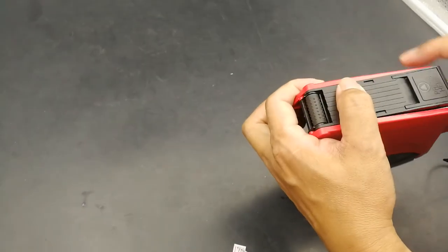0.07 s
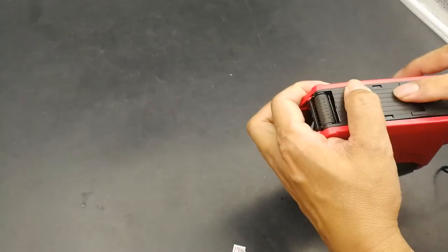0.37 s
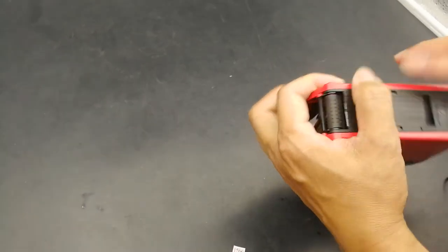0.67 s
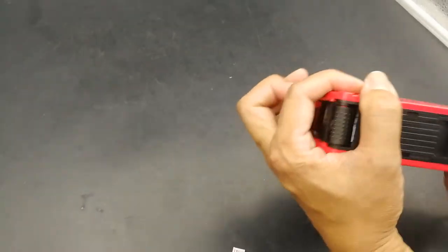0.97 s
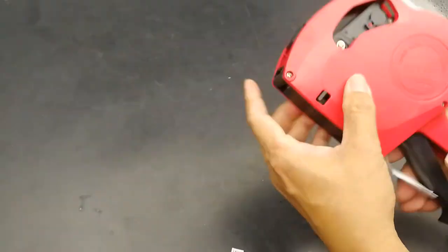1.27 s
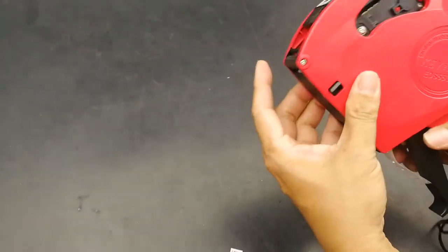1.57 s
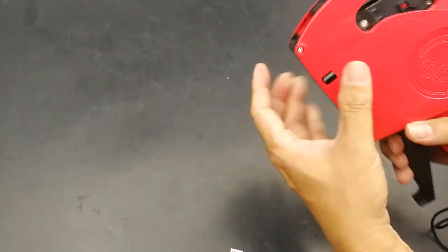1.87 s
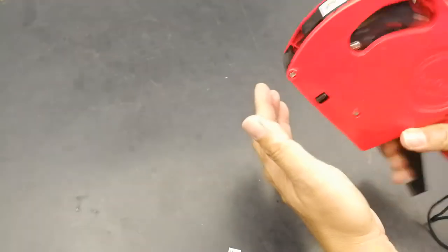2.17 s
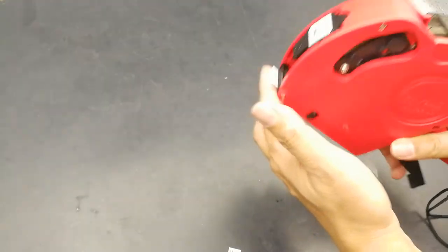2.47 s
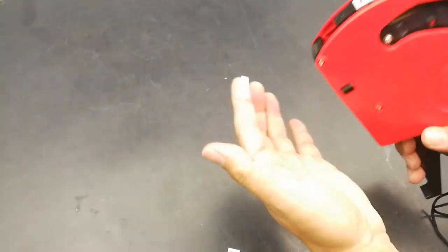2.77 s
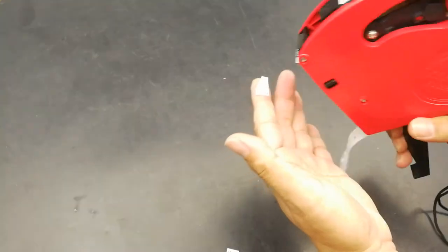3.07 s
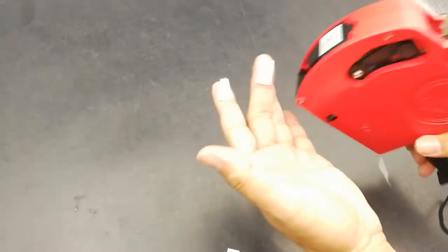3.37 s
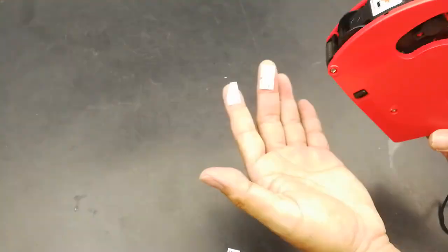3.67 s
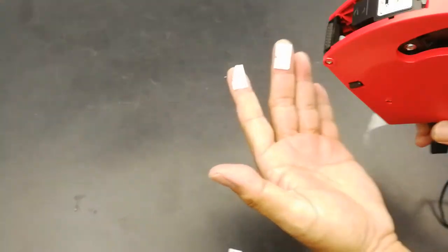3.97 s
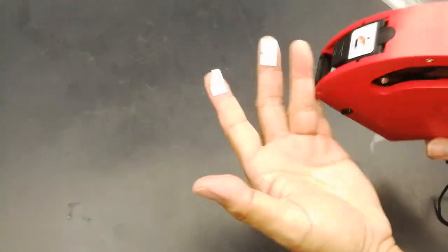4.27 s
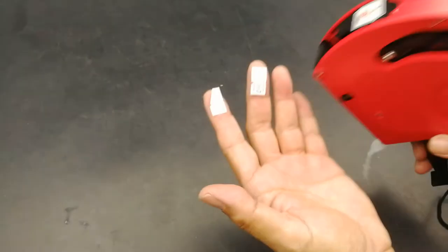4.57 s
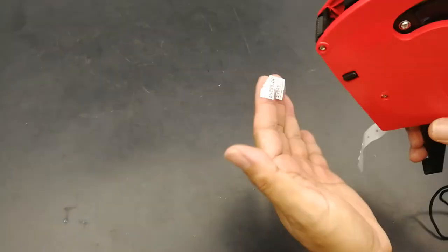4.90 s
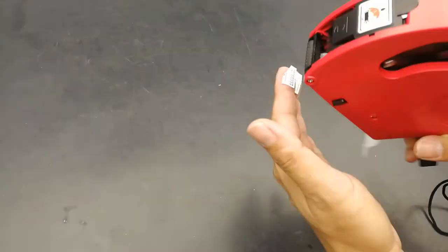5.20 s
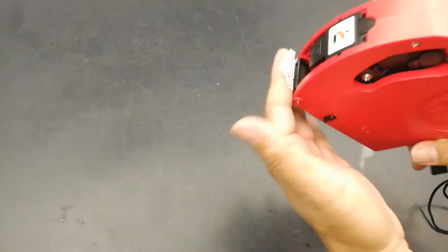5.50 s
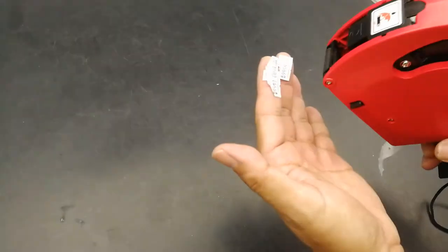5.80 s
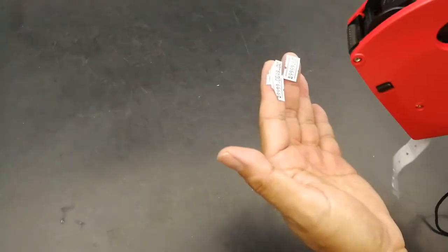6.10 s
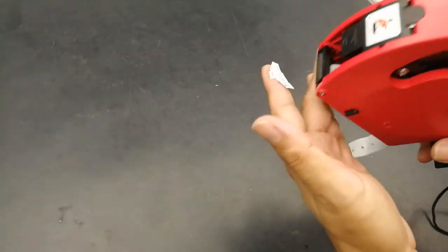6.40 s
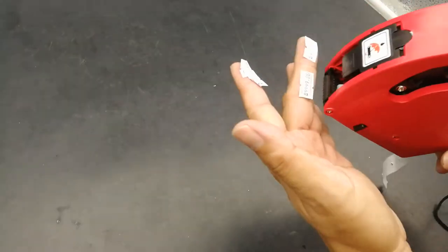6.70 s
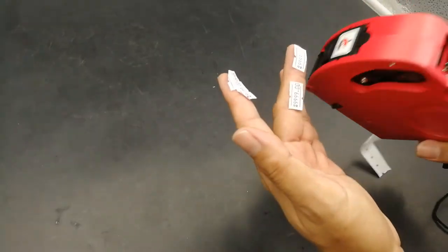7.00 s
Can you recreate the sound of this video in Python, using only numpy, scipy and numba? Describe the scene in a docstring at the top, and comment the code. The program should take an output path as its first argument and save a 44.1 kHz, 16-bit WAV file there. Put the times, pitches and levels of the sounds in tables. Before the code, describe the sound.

Close to the microphone in a small, quiet room, a handheld label gun gives one bright snap and some light handling noise. Five sharp double clacks follow at a fairly even pace as the lever is squeezed and released, with a short ring from the hollow plastic case and its spring. After each pair, the roller taps and rubs a label onto a finger. Ventilation hums softly underneath.

```python
"""Five sharp plastic double clacks with light clicks and rubs between them, over a soft ventilation hum.
A price labeller is snapped shut, turned over and squeezed five times in a small quiet room.
Each squeeze scrapes the lever along, slams the print head home and lets it spring back; the hollow case
and the return spring ring. After each one the roller wipes the label onto a finger."""
import sys
import numpy as np
from scipy import signal
from scipy.fft import rfft, irfft
from scipy.io import wavfile
from scipy.ndimage import uniform_filter1d, minimum_filter1d
from numba import njit

SR = 44100
rng = np.random.default_rng(int(sys.argv[2]) if len(sys.argv) > 2 else 0)


def digitize_waveform(pressure):
    """Quantize a signal to 16-bit integers and store it at the path in sys.argv[1].

    Rows of a 2-D input are taken as channels; values are limited to [-1, 1].
    """
    field = np.atleast_2d(pressure).T
    bounded = np.clip(field, -1, 1)
    quanta = np.round(bounded * 32767).astype(np.int16)
    wavfile.write(sys.argv[1], SR, quanta)


N = 310905
RING = 16384  # samples that one contact is given to ring out
AGE = np.arange(RING) / SR  # seconds since a contact
TIME = np.arange(N) / SR
SLAM, RETURN, OUTSIDE = 0, 1, 2  # kinds of contact: each picks its own column of ring levels

# tone colour (how strong each frequency is) of a blow inside the case: (frequency [Hz], level [dB])
SLAM_COLOUR = [(100, -18), (350, -30.5), (600, -20.5), (830, -19.5), (1100, -7), (1600, -5), (2200, -7),
               (3300, -3), (5500, -1), (8000, -1.5), (10100, 2.5), (11000, -5), (13500, -11), (16000, -31)]
# tone colour of a touch on the outer shell: (frequency [Hz], level [dB])
SHELL_COLOUR = [(100, -46), (500, -53), (750, -24), (1100, -3.5), (1600, -2.5), (2800, -1), (4100, 0),
                (5500, -3), (8000, -1), (10000, -2), (11200, -11.5), (13500, -18), (16000, -29)]


def undb(db):
    """Turn decibels into a factor to multiply by."""
    return 10 ** (np.asarray(db) / 20)


def fade(t60):
    """A decay that loses 60 dB in t60 seconds."""
    return np.exp(-np.log(1000) * AGE / t60)


def unit(x):
    """Scale a signal to an average (rms) level of 1."""
    return x / np.sqrt(np.mean(x ** 2))


def wander(samples):
    """A random wobble: noise averaged over this many samples."""
    return unit(uniform_filter1d(rng.standard_normal(N), size=samples))


def pan(db):
    """Two channel gains that make the left side db louder than the right."""
    return undb(np.array([[.5], [-.5]]) * db)


def add(out, s, sound):
    """Mix a sound in, starting at s seconds."""
    i = max(int(s * SR), 0)
    out[:, i:i + sound.shape[-1]] += sound[..., :N - i]


def spectrum_db(points, hz):
    """Read levels between (Hz, dB) points, with octaves evenly spaced."""
    point_hz, db = np.transpose(points)
    return np.interp(np.log(np.maximum(hz, 1)), np.log(point_hz), db)


def ring_after(x, gain):
    """Filter by a gain curve so that all ringing comes after the blow (minimum phase)."""
    cepstrum = irfft(np.log(gain))
    cepstrum[..., 1:RING // 2] *= 2
    cepstrum[..., RING // 2 + 1:] = 0
    return irfft(rfft(x) * np.exp(rfft(cepstrum)))


def noise(colour, alike_hz):
    """Stereo noise of a given colour; below alike_hz both sides hear nearly the same."""
    hz = np.fft.rfftfreq(N, 1 / SR)
    mid, side = rfft(rng.standard_normal((2, N))) * undb(spectrum_db(colour, hz))
    side = side * hz / np.hypot(hz, alike_hz)
    return unit(irfft(np.array([mid + side, mid - side]), N))


def room(fan_hz=98, hum_db=-57.5, air_db=-53.5, rise_s=0.043, fall_s=0.74):
    """Air hisses softly; the ventilation adds a wavering hum and a rumble that swell twice."""
    # still air of the room: (frequency [Hz], level [dB])
    air_colour = [(12, -27.5), (20, 4), (70, -5.5), (104, -10), (168, -12.5), (270, -11), (388, -24),
                  (802, -22), (1190, -18), (1290, -22), (3950, -30), (4670, -27), (5680, -35.5),
                  (8890, -27.5), (16000, -53)]
    # the hum grows louder: (start [s], start of the fall [s], boost [dB])
    swells = [(0.765, 2.009, 8.5), (3.902, 4.6, 2.5)]
    # ventilation rumble: (frequency [Hz], level [dB])
    rumble_colour = [(30, -14.5), (47, 0.5), (64, -15), (85, -8.5), (98, -11.5), (120, 0.5),
                     (140, -6), (260, -40.5)]
    fan = np.sqrt(2) * np.sin(2 * np.pi * np.cumsum(fan_hz + 3 * wander(6000)) / SR)
    hum = undb(-2) * fan + undb(-3) * noise(rumble_colour, alike_hz=908)
    swell_db = sum(db * np.clip(np.minimum((TIME - start) / rise_s, 1 - (TIME - end) / fall_s), 0, 1)
                   for start, end, db in swells)
    return undb(air_db) * noise(air_colour, alike_hz=479) + hum * undb(hum_db + swell_db)


def whistle(start=4.38, end=4.70, hz=8247, db=-63):
    """A faint thin tone while one label is drawn over the finger."""
    gate = np.clip(np.minimum(TIME - start, end - TIME) / 0.012, 0, 1)
    phase = 2 * np.pi * np.cumsum(hz + 25 * wander(400)) / SR
    return undb(db) * gate * np.sqrt(2) * np.sin(phase)


def knock(contact, colour, tilt_db, ring_hz, ring_db, crack_db, room_t60,
          crack_t60=0.026, late_db=-29, late_t60=0.31):
    """One contact: a short crack and dense echoes from bench and walls, all coloured by the case."""
    # notes at which the hollow case rings:
    # (frequency [Hz], width [Hz], boost at a slam [dB], at a return [dB], from outside [dB])
    case_notes = [(734, 43, 8.5, 2.5, 8.5), (932, 92, 10, 8.2, 4.5), (1058, 304, 12, 3.36, 2.5),
                  (1244, 22, -4, 6, -11), (1684, 40, 9.5, 1.1, 3.5), (1800, 81, 3, 6, 9.5),
                  (2330, 65, 6, 1.2, 3), (2577, 66, 8, 3, -2), (2990, 140, 3.5, 4.5, -2),
                  (3810, 660, 4.5, 2.5, 3), (4400, 200, 3, 6.2, 0), (4760, 270, 1.5, 4.3, 2),
                  (6660, 130, 4.5, 2.6, -1.5), (7900, 110, 8.5, 4.3, 7), (8590, 250, 5.5, 3.1, -2.5),
                  (8700, 160, 6, 1.9, 6), (9430, 880, 2, 7.3, 4.5), (10000, 150, 1.5, 1.6, -4.5)]
    hz = np.fft.rfftfreq(RING, 1 / SR)
    attack = 1 - fade(.005)
    crack = rng.standard_normal(RING) * fade(crack_t60) * attack * undb(crack_db)
    direct = np.array([np.pad(crack, (6, 0))[:RING], crack])  # reaches the left side 6 samples later
    mid, side = rng.standard_normal((2, RING))
    side = irfft(rfft(side) * hz / np.hypot(hz, 1100))  # long waves reach both sides alike
    echo_shape = (fade(room_t60) + undb(late_db) * fade(late_t60)) * (1 - fade(0.0054))
    burst = direct + unit(np.array([mid + side, mid - side])) * echo_shape
    # a sharp contact holds all frequencies evenly, so the chance bumps of the noise are divided out
    bumps = np.sqrt(uniform_filter1d(abs(rfft(burst)) ** 2, size=50))
    case_db = sum(boosts[contact] / (1 + (2 * (hz - note_hz) / width) ** 2)
                  for note_hz, width, *boosts in case_notes)
    part_db = ring_db / (1 + ((hz / ring_hz - 1) / 0.096) ** 2)  # one more ring, set by each contact
    slope_db = tilt_db * np.log2(np.clip(hz, 900, 12000) / 4000)  # tilt_db: brightness in dB per octave
    gain = unit(undb(spectrum_db(colour, hz) + case_db + part_db + slope_db))
    return ring_after(burst, gain / unit(bumps))


def friction(length, response, slips_per_s, scatter_db, breakaway_db, swell=0):
    """Parts break loose, then stick and slip; each slip rings the case. Swell presses hardest midway."""
    n = max(int(length * SR), 2)
    wait, size = rng.random(400), rng.standard_normal(400)
    at = (np.cumsum(2 * wait) - 2 * wait[0]) * SR / slips_per_s
    force_db = np.append(breakaway_db, scatter_db * np.clip(size[1:], -2, 2))
    force = undb(force_db) * rng.choice([-1, 1], len(size))
    pressure = np.sin(np.pi * (np.arange(n) + .5) / n) ** swell
    slips = np.bincount(at[at < n].astype(int), force[at < n], n) * pressure
    return signal.fftconvolve(unit(slips)[None], response, axes=1) / np.sqrt(np.sum(response ** 2) / 2)


def click(tilt_db, ring_hz, ring_db):
    """A light tap on the outside of the shell."""
    return knock(OUTSIDE, SHELL_COLOUR, tilt_db, ring_hz, ring_db,
                 crack_db=2.5, crack_t60=0.024, room_t60=0.089)


def rub(length, tilt_db, ring_db, swell):
    """Skin, roller or label paper rubs in separate little catches that ring the shell."""
    response = knock(OUTSIDE, SHELL_COLOUR, tilt_db, ring_hz=3900, ring_db=ring_db,
                     crack_db=7.5, crack_t60=0.0096, room_t60=0.095)
    return friction(length, response, slips_per_s=270, scatter_db=6, breakaway_db=3, swell=swell)


def handling():
    """Fingers click on the shell, change their grip and slide over it."""
    # fingers, labels and loose parts tap the shell:
    # (time [s], level [dB], brightness [dB/octave], pitch of the struck part [Hz], its boost [dB])
    taps = [(.007, -28, 2, 3600, 5), (.230, -39.5, -2.5, 1580, 5), (.665, -40.5, 2.5, 1800, 8),
            (0.756, -39, -5, 4340, 18), (.936, -29.5, -11, 2300, 18), (1.034, -31, -5.5, 800, 14),
            (1.329, -28, -6, 1860, 1), (2.509, -27, 2.5, 4430, 13), (2.6, -36.5, -2, 4020, 11.5),
            (3.328, -20.5, 0, 4120, 15), (3.462, -45, 2, 1790, 15.5), (4.285, -27, -2.5, 4020, 9.5),
            (4.605, -41.5, 0, 7900, 9), (4.69, -32.5, 5.5, 1790, 14.5), (5.4233, -24.5, 1, 3900, 8.5),
            (5.598, -36.5, -3.5, 4080, 2), (6.561, -32, 0.5, 3870, 12), (6.698, -27.5, 0, 4230, 15.5)]
    # the hand changes its grip: (middle [s], length [s], level [dB], brightness [dB/octave])
    grip_changes = [(0.689, .04, -48.5, 0.5), (0.942, 0.066, -38, -0.5), (1.075, 0.037, -39, -5.5),
                    (1.15, 0.053, -46, 1.5), (1.303, .07, -40.5, -7.5), (5.415, 0.026, -41, 2)]
    # hands slide over the shell: (time [s], level [dB])
    slide_levels = [(0.0, -52), (0.55, -65.5), (1.02, -45), (1.45, -57), (2.0, -55)]
    # hiss of sliding skin: (frequency [Hz], level [dB])
    skin_colour = [(300, -22.5), (1000, -6), (2500, -4.5), (6000, -8), (9300, 0.5), (11500, -10.5),
                   (16000, -27.5)]
    out = np.zeros((2, N))
    for s, db, tilt_db, ring_hz, ring_db in taps:
        add(out, s, undb(db) * click(tilt_db, ring_hz, ring_db))
    for s, length, db, tilt_db in grip_changes:
        add(out, s - length / 2, undb(db) * rub(length, tilt_db, ring_db=-1, swell=0.71))
    skin = noise(skin_colour, alike_hz=900)
    slide_db = np.interp(TIME, *np.transpose(slide_levels), right=-120)
    grip_db = 2.6 * wander(1300)  # sliding fingers catch and let go
    return out + skin * undb(slide_db + grip_db)


def wipes(peel_s=.06):
    """The roller lands on a finger, runs along it, and the label peels off with a rasp."""
    # one row a label: (time [s], landing level [dB], its brightness [dB/octave], rolling time [s],
    # rolling level [dB], peeling level [dB])
    labels = [(2.468, -22, 4.5, 0.1, -40, -48), (3.246, -28, 0, 0.096, -35.5, -26),
              (4.206, -26, -3.5, 0.083, -39.5, -35), (5.486, -24.5, 9, .066, -38, -36),
              (6.606, -25.5, 0.5, 0.11, -44, -55)]
    out = np.zeros((2, N))
    for s, db, tilt_db, roll_s, roll_db, peel_db in labels:
        add(out, s, undb(db) * click(tilt_db, ring_hz=4150, ring_db=3.5))
        add(out, s, undb(roll_db) * rub(roll_s, tilt_db=-2, ring_db=0.5, swell=0))
        add(out, s + roll_s - peel_s / 2, undb(peel_db) * rub(peel_s, tilt_db=-1, ring_db=9, swell=0.26))
    return out


def cover():
    """The thin cover plate snaps shut over its two latches, bright and dry."""
    # the cover slides over a latch: (start [s], end [s], level [dB], brightness [dB/octave])
    latches = [(0.419, 0.423, -1.5, 4.5), (0.4456, 0.45, -8.5, -0.5)]
    # tone colour of the plate: (frequency [Hz], level [dB])
    plate_colour = [(100, -41.5), (600, -34), (1000, -14.5), (1750, -12), (2600, -2), (4200, -8),
                    (6000, -5), (8500, -2), (10100, -5), (11200, -10.5), (13500, -19.5), (16000, -26)]
    out = np.zeros((2, N))
    for start, end, db, tilt_db in latches:
        response = knock(OUTSIDE, plate_colour, tilt_db, ring_hz=3700, ring_db=2.5,
                         crack_db=9, crack_t60=0.012, room_t60=0.083, late_db=-28.5)
        snap = friction(end - start, response, slips_per_s=1800, scatter_db=3, breakaway_db=-4)
        add(out, start, undb(db) * snap)
    return out


def scrape(length, tilt_db):
    """The lever grinds along its guide."""
    response = knock(SLAM, SLAM_COLOUR, tilt_db, ring_hz=1050, ring_db=-1.5,
                     crack_db=1.5, room_t60=0.095, late_db=-33.5)
    return friction(length, response, slips_per_s=600, scatter_db=4, breakaway_db=6)


def spring(contact):
    """The coil spring rings on after a blow; different notes stand out when squeezed and when slack."""
    # its notes: (frequency [Hz], time to fade 60 dB [s], level at a slam [dB], at a return [dB])
    notes = [(1803, .3, -51, -45), (2310, .3, -49, -60), (2970, .65, -54, -45.5), (3900, .4, -51.5, -43.5),
             (4590, 0.3, -35.5, -57.5), (4650, .5, -50, -50.5), (5230, 0.24, -42, -49),
             (8960, .19, -48, -54)]
    phases = rng.uniform(0, 2 * np.pi, (len(notes), 1, 1))
    phases = phases + rng.standard_normal((len(notes), 2, 1)) / 2  # left and right differ a little
    return sum(undb(levels[contact]) * fade(t60) * np.sin(2 * np.pi * hz * AGE + phase)
               for (hz, t60, *levels), phase in zip(notes, phases))


def clack(tilt_db, hollow_hz, hollow_db):
    """A moving part strikes inside the case and rings its hollow."""
    return knock(SLAM, SLAM_COLOUR, tilt_db, hollow_hz, hollow_db,
                 crack_db=4, room_t60=0.06, late_db=-27)


def thump(s=6.0747, width_s=0.00085, db=-14):
    """A dull thump comes with the last slam."""
    return -undb(db) * np.exp(-abs(TIME - s) / width_s)


def returns(unstick_db=-26.5):
    """The lever comes unstuck, feeds the next label and hits its stop, where the slack spring rings."""
    # the lever hits its stop: (time [s], level [dB], brightness [dB/octave], pitch of the gripped
    # hollow [Hz], its boost [dB], spring [dB], lever travel [s], left minus right [dB])
    stops = [(2.2133, -4, -1.64, 1395, 5.5, 6, .028, 1.2), (2.9991, -4.5, -1.5, 1750, 3, 0, 0.03, 1.5),
             (3.816, -8, -2.5, 1290, -5, -15, 0.056, 0), (5.2550, -7.5, -1.4, 1036, 7.5, -16, .060, -1.1),
             (6.2492, -4.5, -2.5, 1076, -6.5, 2.5, 0.048, 0)]
    # tone colour of that blow: (frequency [Hz], level [dB])
    stop_colour = [(100, -47), (350, -34.5), (600, -27.5), (830, -19), (1100, -1.5), (1350, -6.5),
                   (2100, -7), (3300, -7), (6000, -4.5), (8300, -0.5), (10100, -4), (11000, -6.5),
                   (13500, -12.5), (16000, -23)]
    # the held lever slips a little: (start [s], end [s], level [dB], brightness [dB/octave])
    lever_slips = [(2.128, 2.15, -31, -6), (5.118, 5.122, -30.5, -9), (5.163, 5.168, -22, -3)]
    out = np.zeros((2, N))
    for s, db, tilt_db, hollow_hz, hollow_db, spring_db, travel_s, pan_db in stops:
        sides = pan(pan_db)
        feed_db = -27 + 6 * np.log2(.04 / travel_s)  # a return twice as quick scrapes 6 dB louder
        add(out, s - travel_s, sides * undb(unstick_db) * clack(-4, hollow_hz=1070, hollow_db=3.5))
        add(out, s - travel_s, sides * undb(feed_db) * scrape(travel_s, tilt_db=-1.5))
        blow = knock(RETURN, stop_colour, tilt_db, hollow_hz, hollow_db,
                     crack_db=-0.5, room_t60=0.074, late_db=-28)
        add(out, s, sides * undb(db) * (blow + undb(spring_db) * spring(RETURN)))
    for start, end, db, tilt_db in lever_slips:
        add(out, start, undb(db) * scrape(end - start, tilt_db))
    return out


def squeezes(trip_lead_s=0.0092, ride_s=0.0042, bounce_s=.004, bounce_db=-4.5):
    """The lever scrapes in, the feed catch trips, the print head slams and bounces, the spring rings."""
    # the head slams home: (time [s], level [dB], brightness [dB/octave], pitch of the gripped hollow
    # [Hz], its boost [dB], spring [dB], lever travel [s], catch [dB], left minus right [dB])
    slams = [(2.031, 0, 0, 930, 0, 3, 0.043, -10, -0.5),
             (2.859, -0.5, -0.6, 1060, 4.5, 6, 0.035, -13.5, 1.5),
             (3.660, -2.5, 0, 1700, 5.5, -2, .037, -16, 2),
             (5.0319, 0.5, -1.6, 1120, -3.5, 9.5, 0.043, -24, 1),
             (6.0711, -4, 0.06, 830, -7, 0, .046, -17, 2)]
    out = np.zeros((2, N))
    for s, db, tilt_db, hollow_hz, hollow_db, spring_db, travel_s, catch_db, pan_db in slams:
        sides = pan(pan_db)
        add(out, s - travel_s, sides * undb(catch_db - 28) * scrape(travel_s, tilt_db=-0.6))
        # the catch rides up its tooth, then trips just before the slam, a little brighter
        trip = s - trip_lead_s
        add(out, trip - ride_s, sides * undb(catch_db - 14.5) * scrape(ride_s, tilt_db=-2))
        add(out, trip, sides * undb(catch_db) * clack(tilt_db + 1, hollow_hz, hollow_db=4))
        blow = clack(tilt_db, hollow_hz, hollow_db)
        add(out, s, sides * undb(db) * (blow + undb(spring_db) * spring(SLAM)))
        add(out, s + bounce_s, sides * undb(db + bounce_db) * clack(tilt_db, hollow_hz, hollow_db))
    return out


def scene():
    """The labeller close by, coloured a little differently on each side, over the room."""
    # how the two sides hear the labeller: (frequency [Hz], left minus right [dB])
    balance = [(300, 2), (650, 1), (1050, -2.5), (2000, 2), (4400, -4), (6300, -1.5), (8300, 3), (12000, 0)]
    labeller = cover() + squeezes() + returns() + wipes() + handling()
    balance_db = spectrum_db(balance, np.fft.rfftfreq(N, 1 / SR)) - 0.3
    placed = irfft(rfft(labeller) * pan(balance_db), N)
    return placed + thump() + whistle() + room()


@njit
def follow(x, release):
    """Track the peaks of a signal: jump up at once and sink slowly."""
    peaks, held = np.empty(len(x)), 0.
    for i in range(len(x)):
        held = max(x[i], held * release)
        peaks[i] = held
    return peaks


def record(dry, makeup_db=0.5, release_s=0.16, knee_db=-9, ratio=1.6, top_hz=15800):
    """Gain control turns the loud clacks down gently and recovers slowly; the highest treble is cut."""
    size = abs(dry).max(axis=0) + 1e-9
    peak = follow(size, np.exp(-1 / (release_s * SR)))
    gain = undb(makeup_db) * np.minimum(1, undb(knee_db) / peak) ** (1 - 1 / ratio)
    gain = np.minimum(gain, 1 / size)  # hold peaks to full scale
    gain = uniform_filter1d(minimum_filter1d(gain, size=70), size=70)  # ease in and out of each dip
    return signal.sosfilt(signal.ellip(8, .2, 70, top_hz, fs=SR, output="sos"), dry * gain)


dry = scene()
out = record(dry)
digitize_waveform(out)
```